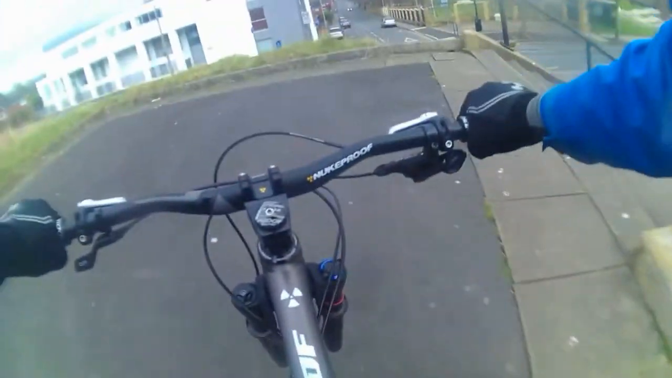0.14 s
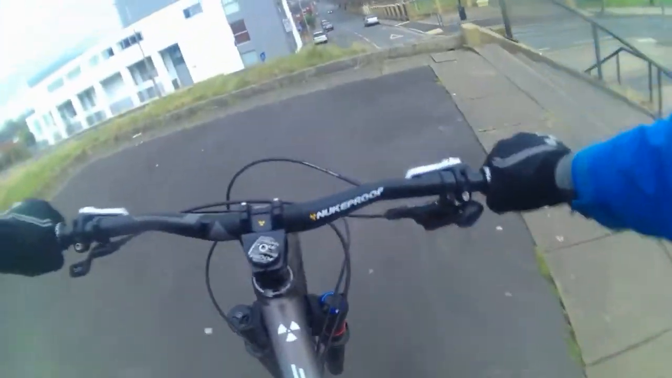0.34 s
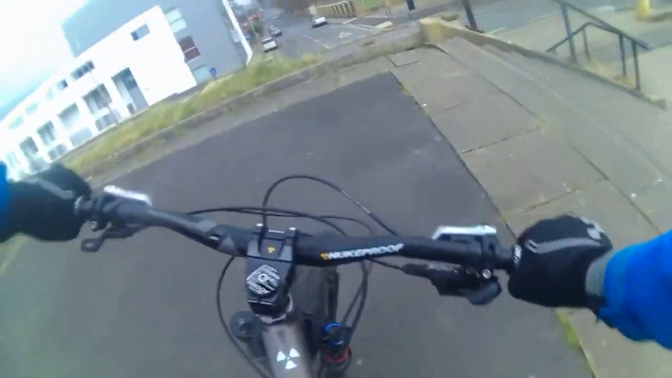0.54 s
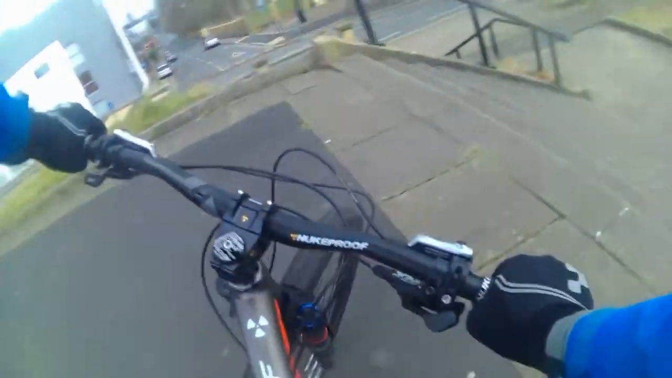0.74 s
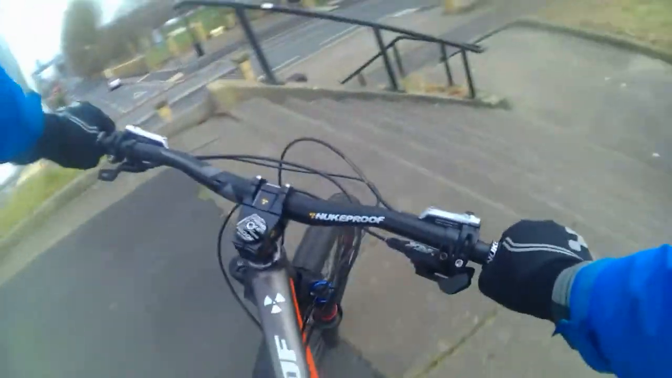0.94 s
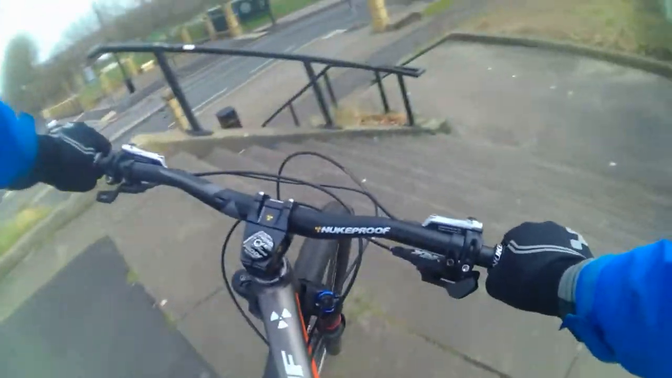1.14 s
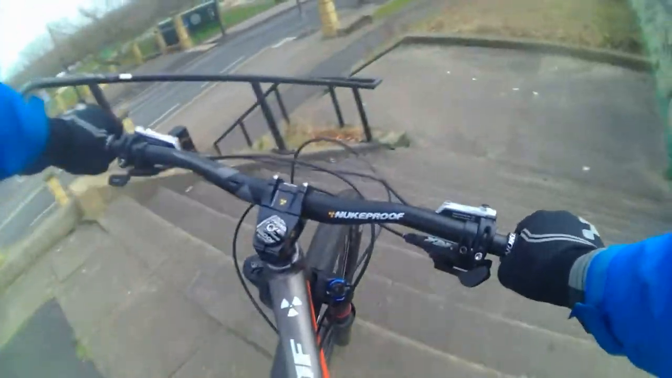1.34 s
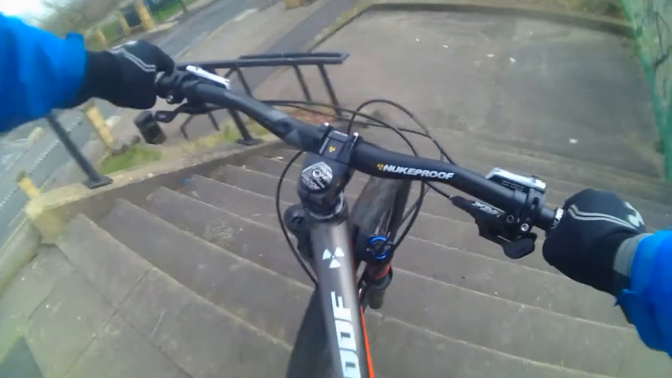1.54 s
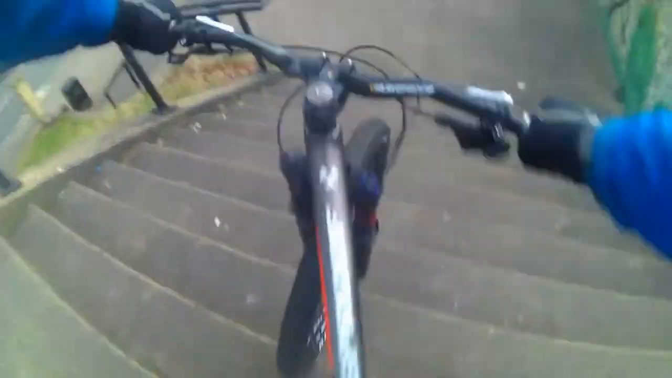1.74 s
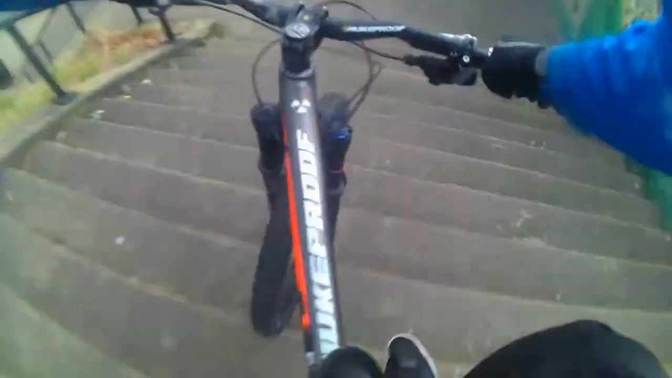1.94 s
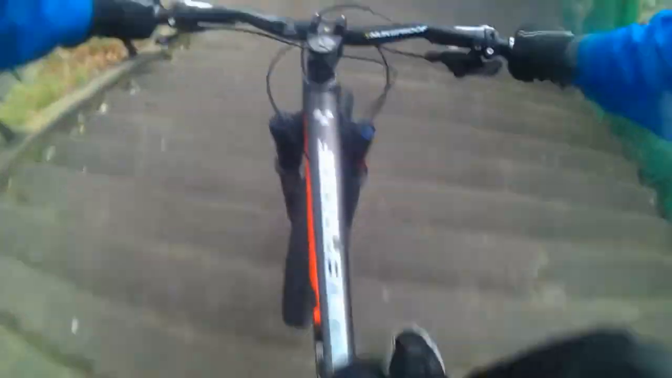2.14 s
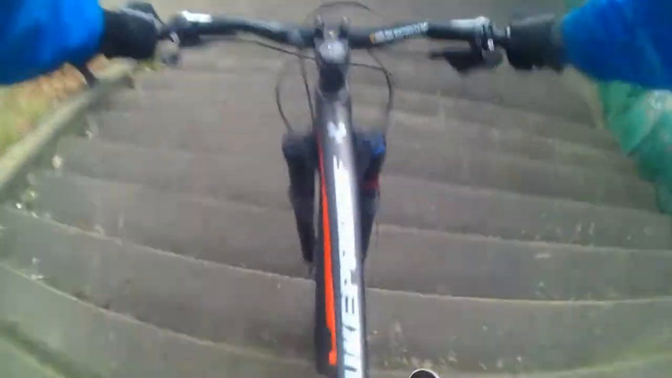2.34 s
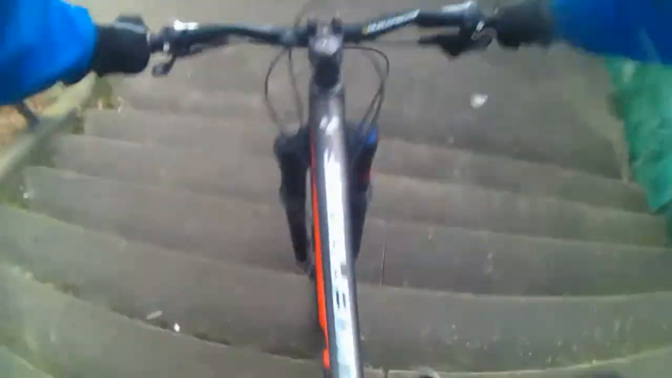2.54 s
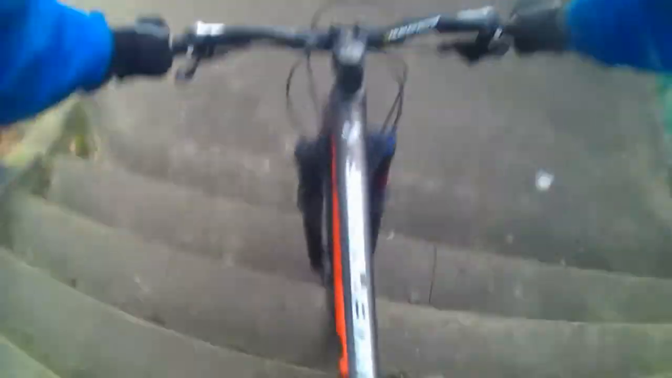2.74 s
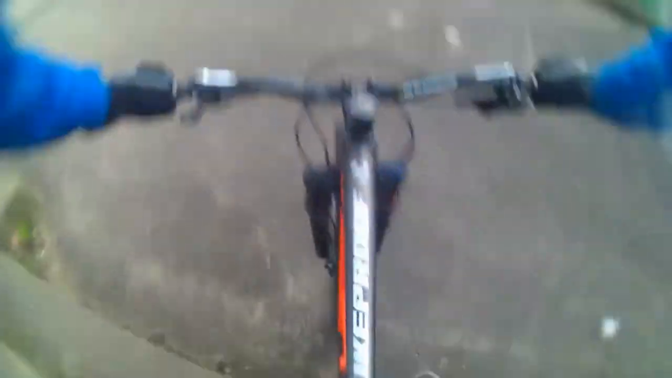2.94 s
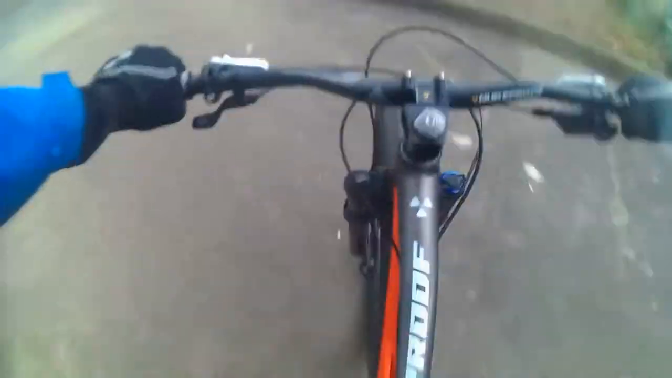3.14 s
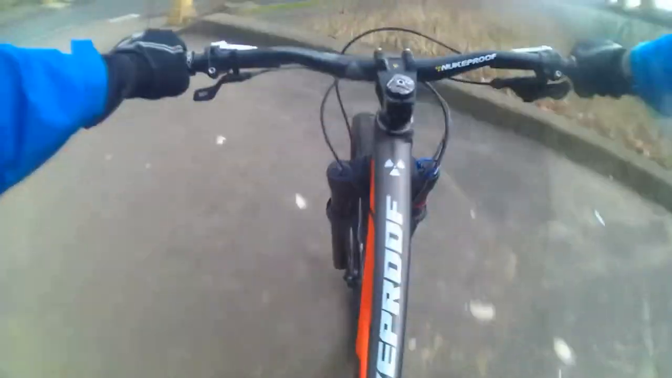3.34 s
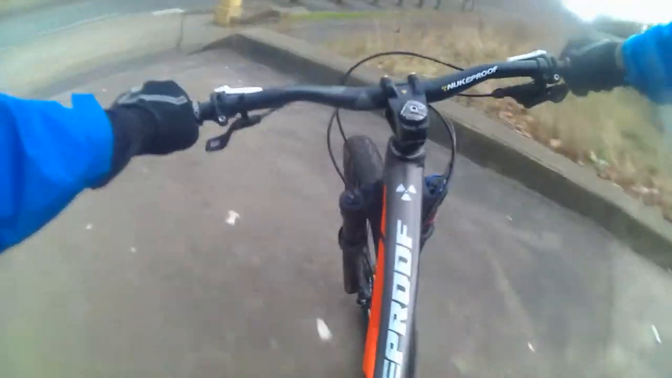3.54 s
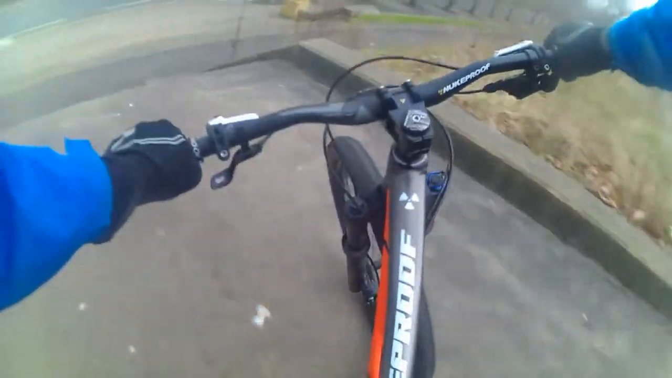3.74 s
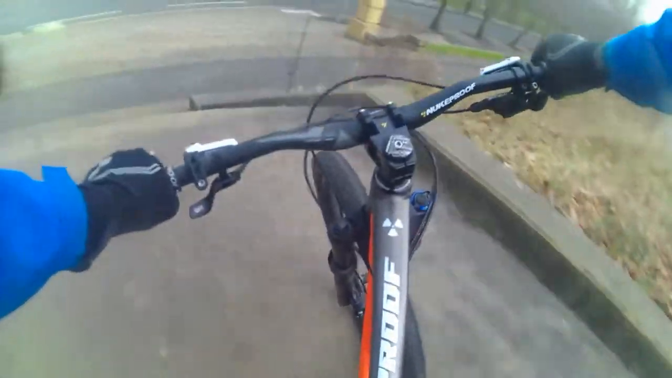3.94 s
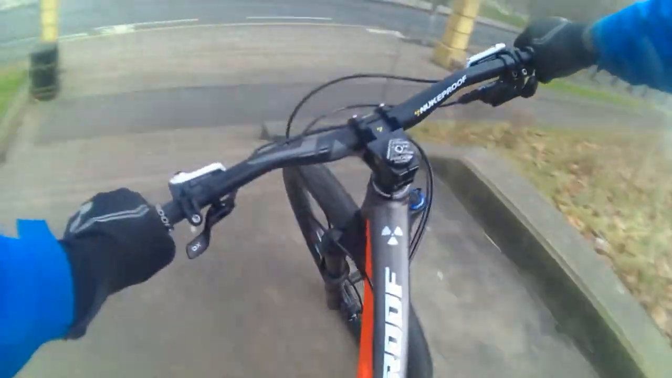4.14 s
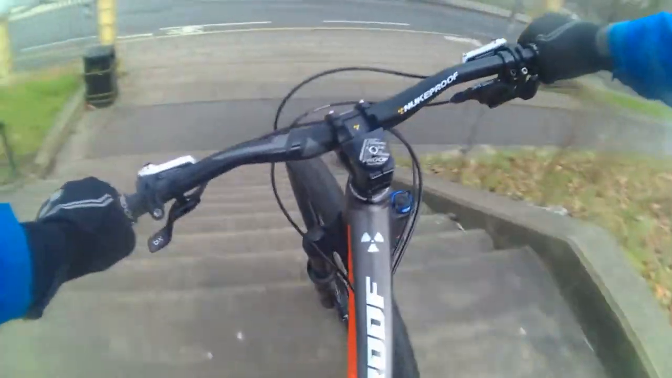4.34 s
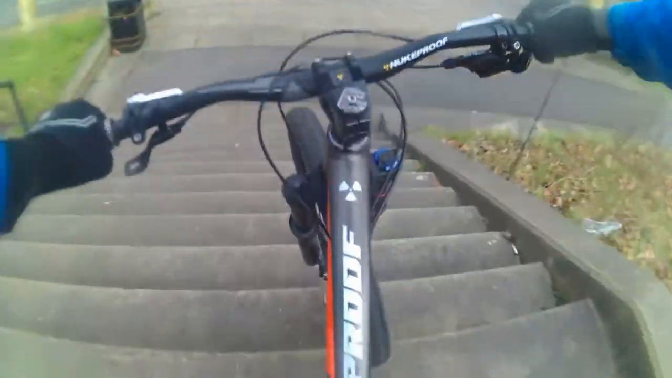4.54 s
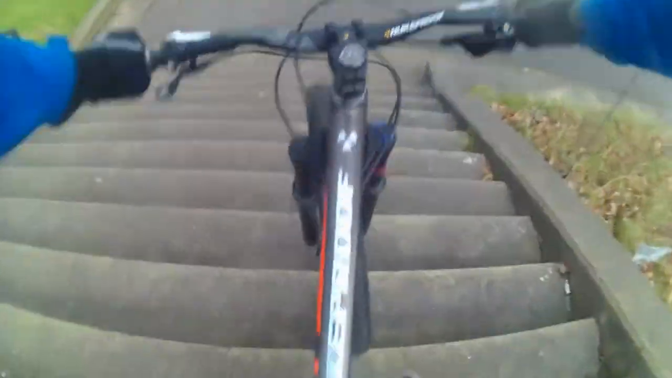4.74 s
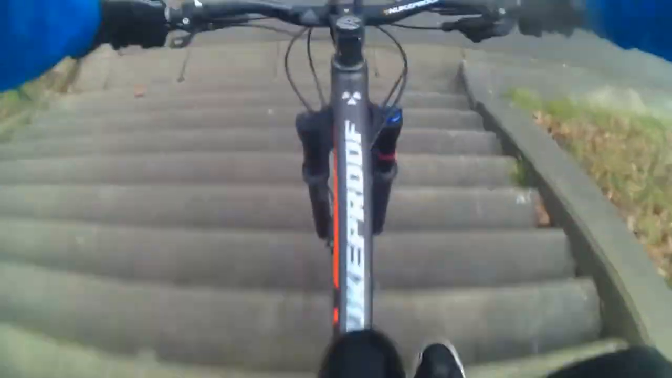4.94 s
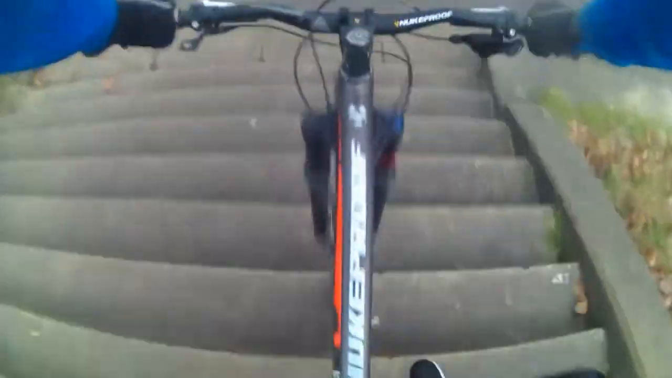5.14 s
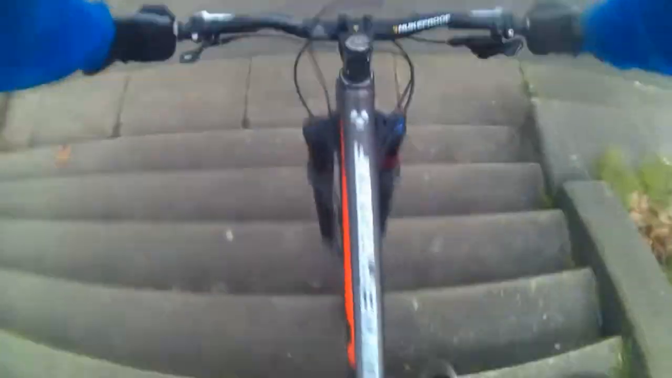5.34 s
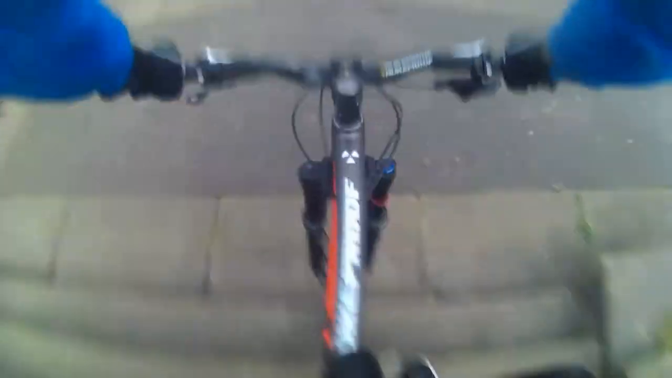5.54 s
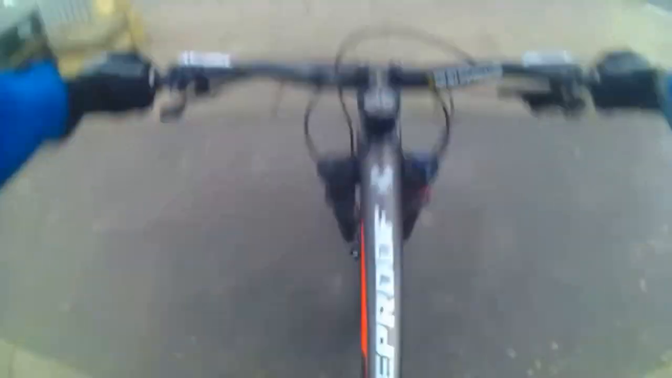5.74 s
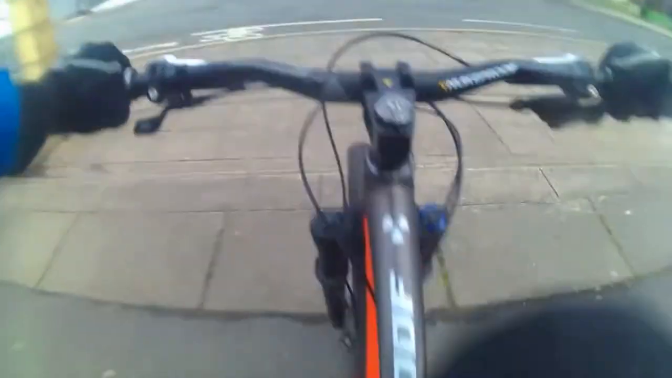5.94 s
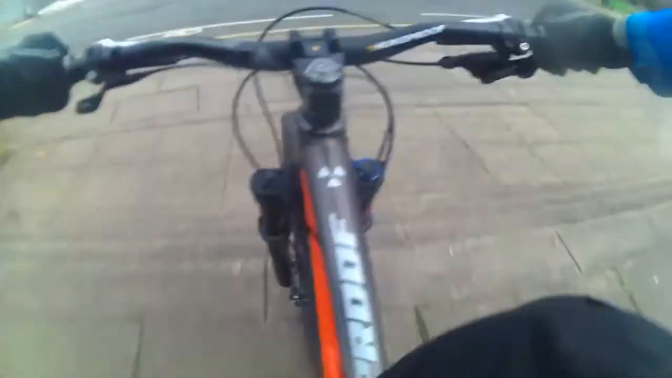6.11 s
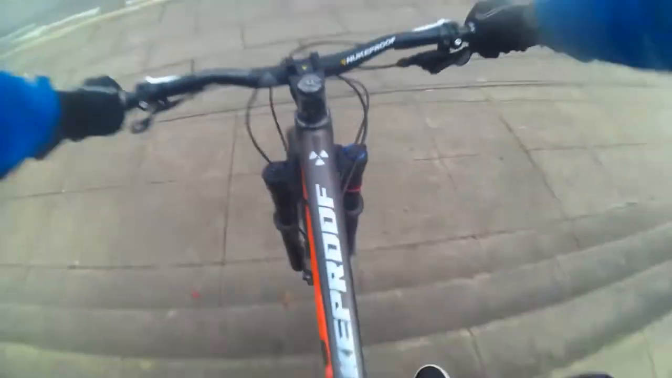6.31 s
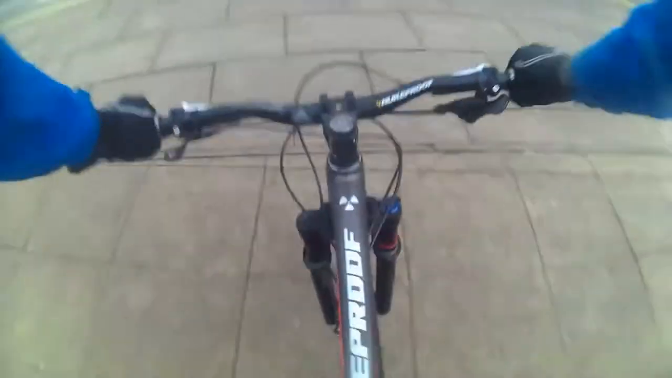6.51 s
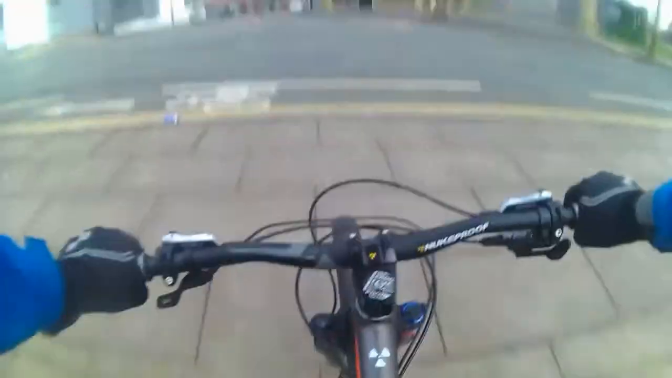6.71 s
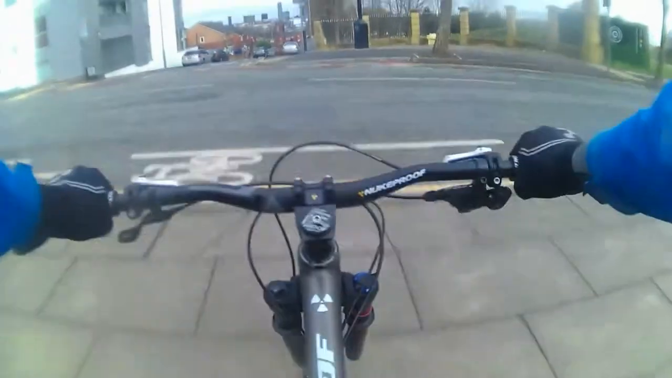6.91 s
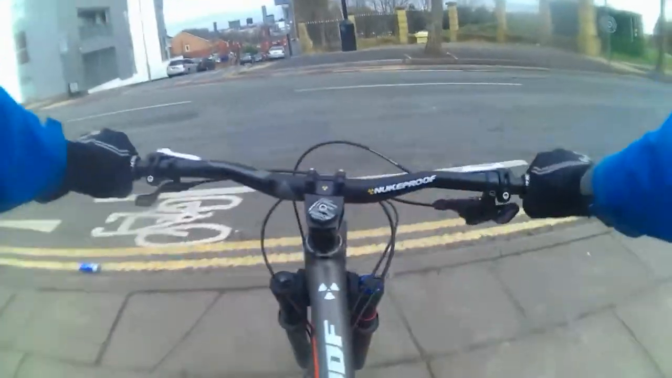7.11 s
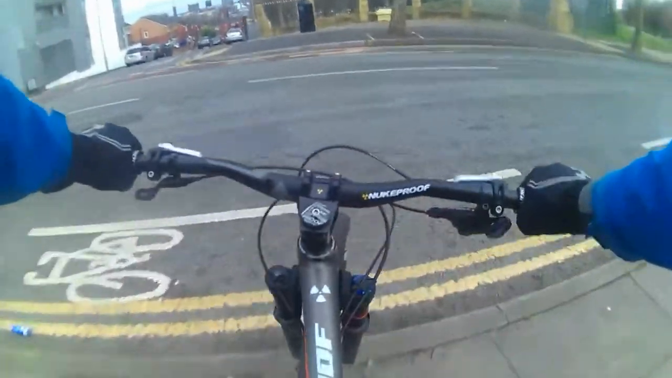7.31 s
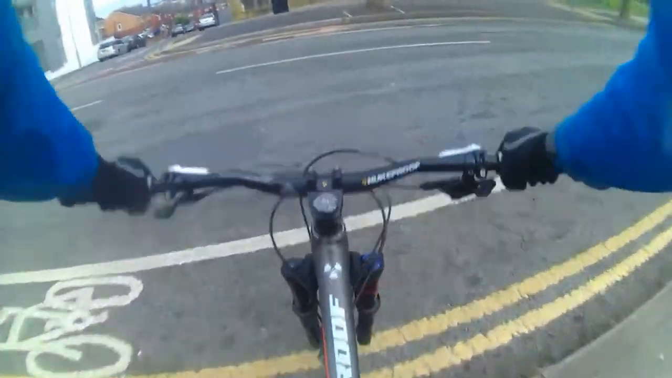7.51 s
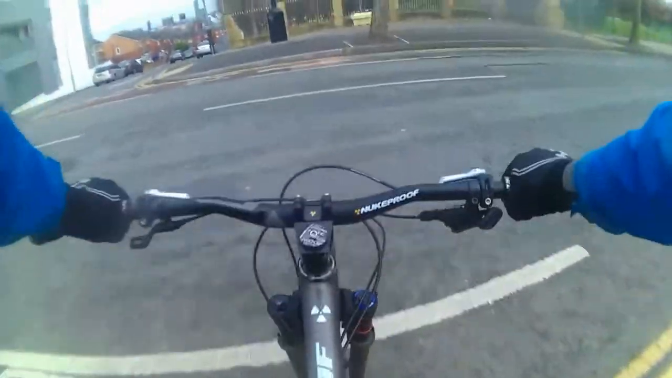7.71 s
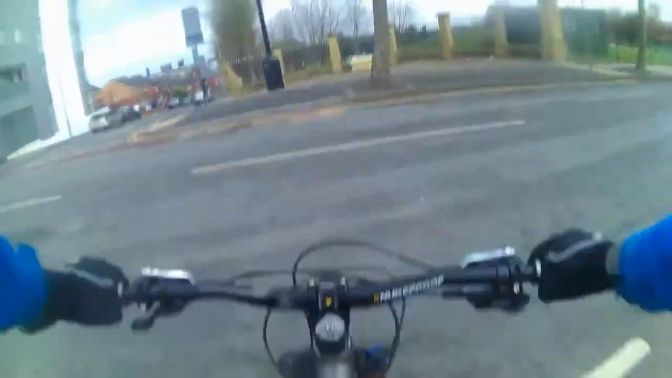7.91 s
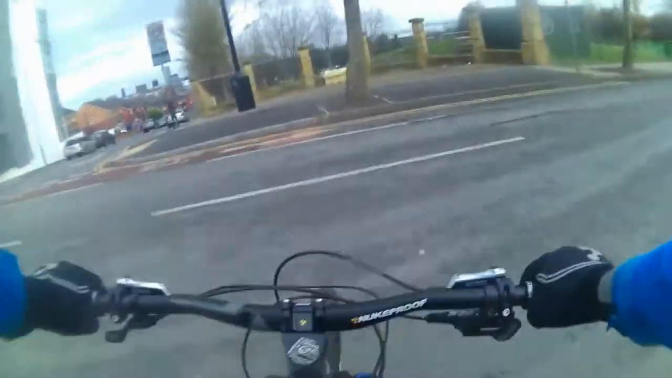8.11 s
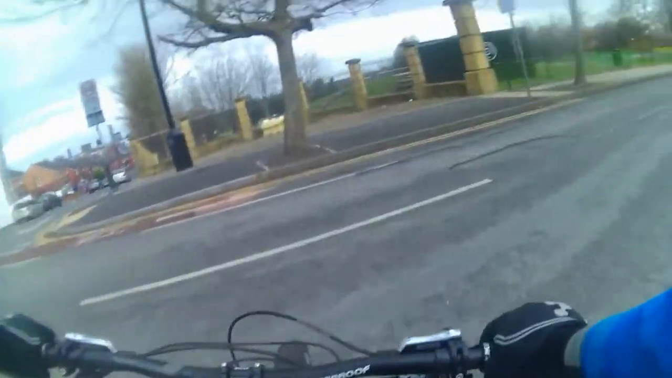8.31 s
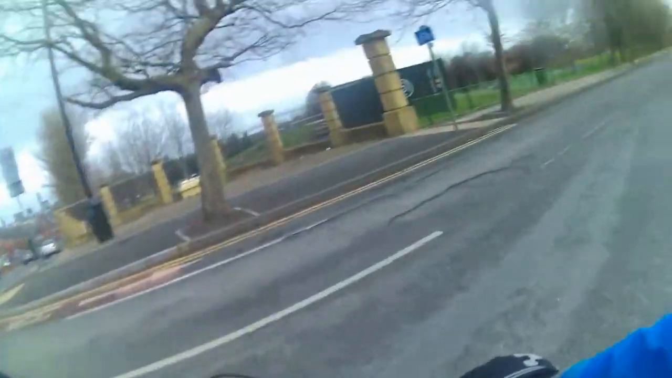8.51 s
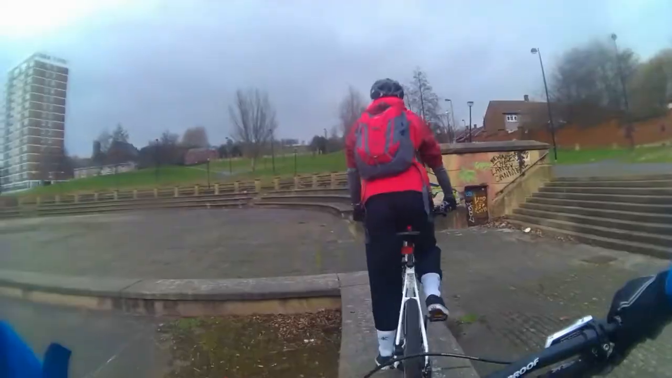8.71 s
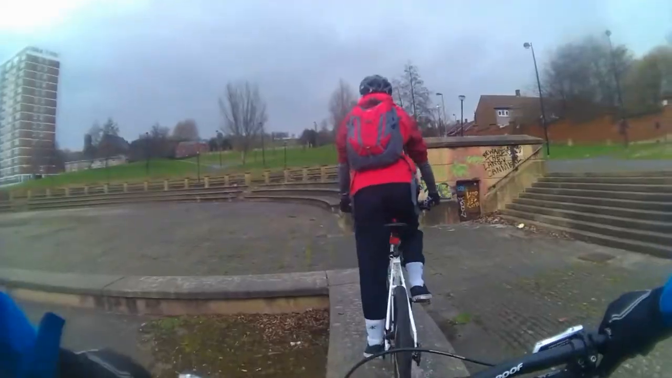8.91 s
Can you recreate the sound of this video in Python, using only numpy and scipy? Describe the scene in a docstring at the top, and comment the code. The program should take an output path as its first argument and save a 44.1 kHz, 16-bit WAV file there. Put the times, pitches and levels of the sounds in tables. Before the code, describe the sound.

Close, heavy thuds and hollow plastic clatter come in bursts as a bicycle rides down three flights of concrete steps, shaking the housing of a microphone worn by the rider. The first two flights are loud and dense, with the hardest hits distorting; the third is only a few lighter knocks. Before, between and after them there is a soft rolling rumble with tyre scuff, light rattling and faint hiss.

```python
"""A low rolling rumble and a hollow housing tone over faint hiss: a bicycle, heard from a camera worn
by its rider. It then rides down three flights of concrete steps. Each step edge is an impulse that
heaves the plastic housing, which thumps, knocks and rattles in its mount, ringing at its normal modes.
The biggest heaves overload the microphone. Between flights the rumble, housing tone and hiss remain;
near the end the sound cuts out for an instant and returns calmer."""
import sys
import numpy as np
from scipy import signal
from scipy.fft import rfft, irfft, next_fast_len
from scipy.io import wavfile
from scipy.ndimage import map_coordinates

SR = 44100
rng = np.random.default_rng(int(sys.argv[2]) if len(sys.argv) > 2 else 0)


def unload_wav(signal):
    """Save mono or channel-first audio to the path in sys.argv[1] as 16-bit WAV at rate SR, clipped to [-1, 1]."""
    wavfile.write(
        sys.argv[1],
        SR,
        np.round(np.clip(np.atleast_2d(signal).T, -1, 1) * 32767).astype(np.int16),
    )


N = 399546


# Heaves at the step edges: (time [s], level [dB], width [ms])
STEP_HEAVES = [(1.804, -12.5, 12), (2.134, -0.5, 13), (2.193, -6.1, 14), (2.261, -0.5, 16),
               (2.312, -6.3, 20), (2.375, -3.7, 15), (2.48, -5.9, 19), (2.524, -9.6, 15), (2.584, -4.1, 18),
               (2.682, 0.9, 14), (2.722, -10.4, 13), (2.778, -5.1, 14), (2.817, -9.8, 10), (2.862, 0.2, 16),
               (2.937, 0.3, 13), (3.011, -6.3, 17), (3.091, -9.3, 20), (4.588, -14, 9), (5.061, 0.7, 17),
               (5.115, -4.4, 14), (5.169, 0.5, 20), (5.215, -6.5, 16), (5.268, -0.5, 17), (5.358, 0.6, 12),
               (5.438, -5, 24), (5.508, 1.8, 21), (5.572, -3, 26), (5.628, -2.5, 11), (5.685, 0.8, 16),
               (5.746, -5.4, 12), (6.4, -9.3, 18), (6.663, -10.5, 15), (7.575, -17, 7), (7.846, -16, 6)]
def heaves():
    """Displacement and restoring force: a step edge pushes the microphone capsule, which swings back."""
    out, t = np.zeros(N), np.arange(-SR // 20, SR // 10) / SR
    for s, db, ms in STEP_HEAVES:
        widths = t * 1000 / ms
        push = np.exp(-((widths - .08) / .53) ** 2)
        swing_back = .5 * np.exp(-((widths - 1.15) / .45) ** 2)
        add(out, s + t[0], amp(db) * (push - swing_back))
    return out


# Impacts of the housing on its mount: (time [s], level [dB], brightness [dB])
MOUNT_IMPACTS = [(2.1288, -3.5, -29), (2.1373, -13.5, -25), (2.1941, -7.5, -3), (2.2259, -11, -30),
                 (2.2577, -8, -32), (2.3089, -11, -6), (2.3409, -16, -18), (2.3785, -14.5, -34),
                 (2.3894, -6, -16), (2.4453, -13, -25), (2.4577, -17, -28), (2.4908, -15.5, -16.5),
                 (2.5812, -14.5, -19.5), (2.591, -6, -14), (2.6433, -15.5, -11), (2.6664, -13.5, -15),
                 (2.6707, -8.5, -21), (2.7003, -2, -13), (2.761, -7, -14), (2.778, -2.5, -21.5),
                 (2.7966, -6.5, -20.5), (2.7998, -6, -7.5), (2.8512, -1.5, -12.5), (2.8561, -3.5, -25),
                 (2.8839, -1, -9.5), (2.909, -9.5, -32), (2.9394, -7, -10.5), (2.9953, -17.5, -20),
                 (2.9991, 1, -9.5), (3.0039, -4.5, -24), (3.0468, -25, -8.5), (4.7517, -30.5, -1),
                 (4.8718, -28, -25), (5.032, -28, -12), (5.0542, -1.5, -17), (5.0624, -13, -15),
                 (5.1117, -6.5, 1), (5.1603, 0.5, -10), (5.1656, -8, -26), (5.1863, -10.5, -24.5),
                 (5.2602, -0.5, -17), (5.263, -12, -17), (5.2951, -8.5, 2), (5.3455, -8, -14),
                 (5.3484, -6, -11), (5.3831, 1.5, -5), (5.3863, -6.5, -13), (5.4095, -21, -25.5),
                 (5.4173, -10, -19), (5.4291, -16, -14), (5.4602, -2, 1), (5.4976, -0.5, -11),
                 (5.502, 0, -13.5), (5.5225, -8.5, -1), (5.525, -0.5, -12), (5.5678, -2.5, -15),
                 (5.584, -9, -1.5), (5.6101, -12.5, -20), (5.6999, -13.5, 0), (5.7462, -14.5, -15.5),
                 (5.7843, -10.5, -22.5), (5.7977, -4.5, -30), (5.8173, -5.5, -9.5), (5.8303, -17, 0.5),
                 (5.9629, -27, -22), (6.3186, -15, -30), (6.3856, -13, -25), (6.4103, -6, -8.5),
                 (6.6402, -34.5, 2), (6.8665, -29, -24), (7.0805, -40, -24), (7.4667, -36, 0)]
def contacts(rattle_db, tap_count=24):
    """Inelastic collision: lists each impact, its weaker rebound, and stray taps under strong rattle."""
    s, db, bright_db = np.transpose(MOUNT_IMPACTS)
    delay_spread, level_spread = rng.standard_normal((len(s), 2)).T
    rebounds = [s + .0035 * amp(2.5 * delay_spread), db - 11 + 3 * level_spread, bright_db - 15.5]
    chance = np.cumsum(np.clip(rattle_db + 41, 0, 6))  # taps need a rattle above -41 dB
    onsets = np.searchsorted(chance, rng.random(tap_count) * chance[-1])
    size, tone = rng.standard_normal((2, tap_count))
    taps = [onsets / SR, np.minimum(rattle_db[onsets] + 12.5, -17) + 3.5 * size, -16 + 4 * tone]
    return MOUNT_IMPACTS + list(np.transpose(rebounds)) + list(np.transpose(taps))


# Normal modes of the housing's body and of its thin shell:
# (frequency [Hz], relative level knocked [dB], relative level rubbed [dB], T60 rubbed [s])
BODY_MODES = [(450, -5, -17.5, 0.011), (740, -1, -3.5, 0.0062), (970, -2, -4, 0.0053),
              (1339, -3, 0.5, 0.013), (1630, -2, -2.5, 0.0062), (1868, -3, -8, 0.015),
              (2780, 1, -27, 0.00067)]
SHELL_MODES = [(3050, -1, -1, .005), (3600, 1, 0, .0055), (4300, 3, -4, .005), (5400, -5, -13, .007),
               (7000, -9, -16, .004), (11500, -11, -34, .003)]
def knocks(rattle_db):
    """Impact excitation: a contact and its short scrape ring the body and the thin shell, the shell louder in
    bright blows."""
    out, t = np.zeros(N), np.arange(SR // 80) / SR
    for s, db, bright_db in contacts(rattle_db):
        contact = .09 * rng.standard_normal(len(t)) * amp(-60 * t / .014)
        contact[0] = -1  # the impulse ahead of the scrape
        rings = []
        for modes in (BODY_MODES, SHELL_MODES):
            hz, knocked_db = np.transpose(modes)[:2]
            levels_db = knocked_db + 2.5 * rng.standard_normal(len(modes))
            levels_db += .32 * bright_db * np.log2(np.maximum(hz / 4300, 1))  # dull blows lose treble
            detune = .04 * rng.standard_normal((len(modes), 1))
            sound = np.convolve(contact, ring(modes, levels_db, damping=2.56, detune=detune))
            rings.append(sound / np.abs(sound).max())
        body, shell = rings
        add(out, s, amp(db + 2) * (body + amp(bright_db - 1.45) * shell))
    return out


# Dull thumps through the strap: (time [s], level [dB], pull time constant [ms])
STRAP_THUMPS = [(1.71, -21.5, 1.36), (1.762, -11.5, 5.6), (1.8, -25, 4.3), (1.893, -15, 5.1),
                (2.085, -11.5, 11), (2.151, -7, 3.1), (2.340, -5.5, 2.4), (2.831, -8, 9.5),
                (3.047, -5.5, 2.5), (4.714, -15.5, 2.3), (4.751, -3.5, 2.8), (4.872, -10, 1.8),
                (5.032, -3, 2.17), (5.639, -6, 4.7), (5.717, -7.5, 2.3), (5.963, -22, 1.4),
                (7.08, -29.5, 1.5), (7.185, -26, 1.46), (7.348, -26, 1.23), (7.442, -21.5, 1.45),
                (7.567, -21.5, 2.8), (7.838, -23, 3)]
def thumps():
    """Free vibration after release: a soft pull snaps back and rings, higher when the pull is short."""
    out, t = np.zeros(N), np.arange(-SR // 30, SR // 30) / SR
    for s, db, ms in STRAP_THUMPS:
        release = 1 / (1 + np.exp(np.clip(t / .00016, -50, 50)))
        pull = np.exp(np.minimum(t, 0) * 1000 / ms) * release
        ringing = .5 * (t > 0) * np.sin(2 * np.pi * 700 / ms * t) * amp(-60 * np.abs(t) / .0097)
        add(out, s + t[0], amp(db + 2.5) * (ringing - pull))
    return out


# Strength of the shaking: (time [s], rumble level [dB], rattle level [dB], rattle brightness [dB])
SHAKE_ENVELOPE = [(0, -41, -51, -16), (.7, -42, -51, -12), (1.2, -44, -58, -18), (1.5, -43, -51, -16),
                  (1.6, -29.5, -44, -10.5), (1.95, -22.5, -48, -8), (2.08, -28, -43, -12),
                  (2.15, -16.5, -38, -5), (2.45, -10.5, -42, -5.5), (2.6, -20, -35.5, -9),
                  (2.9, -9, -32.5, -7), (3.07, -15, -37, -2.5), (3.15, -23, -42, -2.5),
                  (3.32, -25, -47, -6), (3.421, -47, -50.5, -8), (4.2, -42.5, -53.5, -15),
                  (4.45, -51, -58.5, -15), (4.55, -39.5, -47, -9.5), (4.8, -23.5, -43, -8.5),
                  (5.0, -22, -43, -7), (5.1, -5, -38, -5), (5.6, -10.5, -30, -11.5), (5.8, -13.5, -36, -1),
                  (6.0, -27, -46, -8.5), (6.2, -33, -47, -13), (6.5, -26, -43, -7), (6.75, -29, -44, -17),
                  (7.0, -36.5, -47, -20), (7.35, -43, -51, -17), (8.0, -33.5, -52, -9.5),
                  (8.4, -45, -54.5, -21), (8.55, -44, -49.5, -9), (8.671, -34.5, -48, -3),
                  (8.68, -46, -64, -9), (9.06, -46.5, -51, -5.5)]
# Bursts of rattle in the mount: (time [s], gain [dB], half-width [s])
RATTLE_BURSTS = [(1.591, 4.5, .04), (1.76, 3.5, .05), (2.569, 1.5, 0.025), (2.92, 6, 0.021),
                 (3.049, 0.5, 0.023), (5.328, 2, 0.024), (5.422, 11, 0.0088), (5.64, 7.5, 0.074),
                 (5.785, 4, 0.037), (6.37, 6, .04), (6.648, 1.5, 0.035), (7.473, 6.5, 0.058),
                 (7.545, 7, .035), (7.875, 7, 0.053)]
def shaking():
    """Amplitude envelopes of the forced vibration: rumble, rattle and brightness in dB at each sample."""
    times, *columns = np.transpose(SHAKE_ENVELOPE)
    rumble_db, rattle_db, bright_db = [np.interp(np.arange(N) / SR, times, c) for c in columns]
    bursts_db = sum(db * swell(s, half_width) for s, db, half_width in RATTLE_BURSTS)
    return rumble_db, rattle_db + bursts_db, bright_db


# Joints and kerbs that swell the rumble: (time [s], gain [dB])
ROAD_BUMPS = [(.33, -2), (.75, 7.5), (1.13, 10.5), (1.61, 7.5), (1.79, 9.5), (3.58, 15), (3.96, 8.5),
              (4.352, 17), (4.59, 8.5), (6.51, 11.5), (6.71, 1.5), (7.09, 10.5), (7.57, 12), (7.852, 19.5),
              (8.25, 12), (8.63, 11.5)]
# Spectrum of the rolling rumble: (frequency [Hz], relative density [dB])
RUMBLE_SPECTRUM = [(6, -27), (14, 5), (30, 1.5), (55, -9), (100, -11.5), (200, -37.5), (600, -91)]
def rumble(rumble_db):
    """Rolling noise: a low rumble that swells at bumps, its level capped so the heaves stand out."""
    bumps_db = sum(db * swell(s, .044) for s, db in ROAD_BUMPS)
    capped_db = np.minimum(rumble_db + bumps_db + 1.5, -19)
    return amp(capped_db + 3.2 * wobble(14)) * noise(RUMBLE_SPECTRUM)


# Spectrum of the tyre scuff: (frequency [Hz], relative density [dB])
SCUFF_SPECTRUM = [(50, -48.5), (130, 2), (250, -7), (500, -16.5), (1000, -16.5), (3000, -42), (8000, -100)]
def tyre_scuff(rumble_db, rattle_db):
    """Friction noise: the tyres scuff at a level that follows both rumble and rattle."""
    level_db = .61 * rumble_db + .39 * rattle_db - 9.5
    return amp(level_db + 5.6 * wobble(40)) * noise(SCUFF_SPECTRUM)


def chatter(rattle_db, bright_db):
    """Forced resonance: loose parts rub the housing; harder shaking breaks the scrape into soft ticks."""
    level_db = rattle_db + .91 * wobble(7.3)
    shell_db = bright_db + 2.5 * wobble(8) - 4
    roughness = np.clip((level_db + 58) / 16, 0, 1)
    onsets = rng.random(N) < 500 / SR  # about 500 ticks a second
    ticks = onsets * amp(3 * np.minimum(rng.exponential(size=N), 3)) * rng.standard_normal(N)
    soft_ticks = unit(np.convolve(ticks, np.hanning(7), "same"))
    drive = rng.standard_normal(N) + .95 * roughness * soft_ticks
    drive *= amp(level_db - 6 + roughness * (3 * wobble(30) + 3 * wobble(90)))
    body = ring(BODY_MODES, np.transpose(BODY_MODES)[2])
    out = signal.fftconvolve(drive, body / np.linalg.norm(body))[:N]
    # the rubbing point wanders over the shell, so each of its modes comes and goes on its own
    shell_norm = np.linalg.norm(ring(SHELL_MODES, np.transpose(SHELL_MODES)[2]))
    for mode in SHELL_MODES:
        coupling = amp(shell_db + 4 * wobble(45))
        response = ring([mode], np.array(mode[2:3])) / shell_norm
        out += signal.fftconvolve(coupling * drive, response)[:N]
    return out


# Shudders of the frame: (time [s], frequency [Hz], level [dB], half-width [ms])
FRAME_SHUDDERS = [(.31, 88, -32, 18), (.75, 75, -31.5, 30), (1.14, 89.3, -36, 23), (5.875, 72.1, -16.5, 25),
                  (7.55, 190, -32, 28), (8.47, 110, -33.5, 43)]
def shudders():
    """Transient resonance: a low frame mode swells and fades within a few cycles."""
    t = np.arange(N) / SR
    return sum(amp(db) * swell(s, ms / 1000) * np.sin(2 * np.pi * hz * t)
               for s, hz, db, ms in FRAME_SHUDDERS)


# Spectrum of the preamplifier's hiss: (frequency [Hz], relative density [dB])
HISS_SPECTRUM = [(200, 6), (2500, 1), (7000, -4), (11000, -4.5), (15300, -6), (15480, -13.5),
                 (15560, -39.5), (22000, -120)]
# Faint high tones of the electronics: (frequency [Hz], rms level [dB])
WHINE_TONES = [(10110, -81), (10196, -83), (10282, -74), (10368, -78), (10982, -83.5)]
def electronics():
    """Self-noise: the preamplifier adds broadband hiss and a few pure tones."""
    t = np.arange(N) / SR
    tones = sum(amp(db) * np.sqrt(2) * np.sin(2 * np.pi * hz * t) for hz, db in WHINE_TONES)
    return amp(-56) * noise(HISS_SPECTRUM) + tones


def ring(modes, levels_db, damping=1, detune=0):
    """Modal impulse response: a sum of damped sinusoids, neighbours in opposite phase."""
    t = np.arange(SR // 20) / SR
    hz, t60 = np.transpose(modes)[[0, 3], :, None]
    sign = (-1) ** np.arange(len(modes))[:, None]
    decay = amp(levels_db[:, None] - 60 * damping * t / t60)
    waves = decay * np.sin(2 * np.pi * hz * (1 + detune) * t)
    attack = 1 - np.exp(-t / .00021)
    return (sign * waves).sum(0) * attack


def noise(spectrum):
    """Spectral shaping: noise of rms 1 coloured by (frequency [Hz], level [dB]) points."""
    f, db = np.transpose(spectrum)
    white = rng.standard_normal(N)
    return unit(filtered(white, lambda hz: amp(np.interp(np.log(hz + 1), np.log(f + 1), db))))


def filtered(x, response):
    """Linear filtering: the spectrum of x times a complex frequency response."""
    size = next_fast_len(N + SR // 2)
    return irfft(rfft(x, size) * response(np.fft.rfftfreq(size, 1 / SR)), size)[:N]


def wobble(rate):
    """Random modulation: a smooth curve with rate knots a second."""
    knots = rng.standard_normal(int(N * rate / SR) + 4)
    return map_coordinates(knots, [np.arange(N) * rate / SR])


def swell(s, half_width_s):
    """Gaussian envelope centred on s seconds."""
    return np.exp(-((np.arange(N) / SR - s) / half_width_s) ** 2)


def add(track, s, sound):
    """Superposition: mixes a sound in from s seconds."""
    part = track[round(s * SR):][:len(sound)]
    part += sound[:len(part)]


def amp(db):
    return 10 ** (np.asarray(db) / 20)


def unit(x):
    return x / np.sqrt(np.mean(x ** 2) + 1e-20)


def scene():
    """Superposition: all sources sum in one channel, which falls silent for 6 ms near the end."""
    rumble_db, rattle_db, bright_db = shaking()
    rolling = rumble(rumble_db) + tyre_scuff(rumble_db, rattle_db) + chatter(rattle_db, bright_db)
    steps = heaves() + knocks(rattle_db) + thumps()
    gate = np.abs(np.arange(N) / SR - 8.675) > .003
    return ((steps + rolling + shudders() + electronics()) * gate)[None]


def record(dry, coupling_hz=10, band_limit_hz=16478):
    """Overload: the preamplifier clips; AC coupling lets the flat tops sag; a band limit cuts the top."""
    clipped = np.clip(dry[0], -.85, .82)
    coupled = filtered(clipped, lambda hz: 1j * hz / (coupling_hz + 1j * hz))
    return filtered(np.clip(coupled, -.97, .97), lambda hz: hz < band_limit_hz)[None]


dry = scene()
out = record(dry)
unload_wav(out)
```